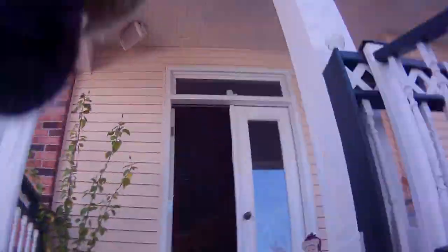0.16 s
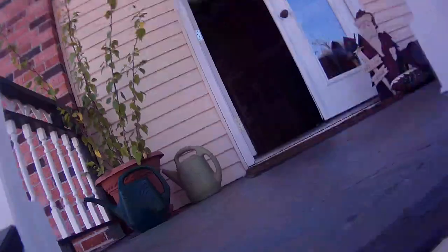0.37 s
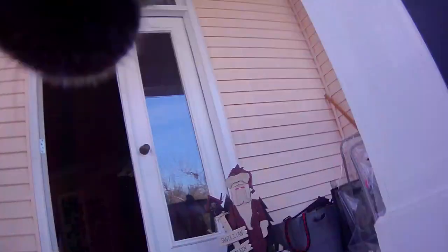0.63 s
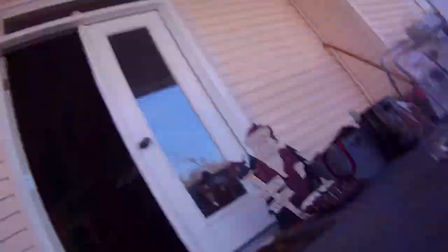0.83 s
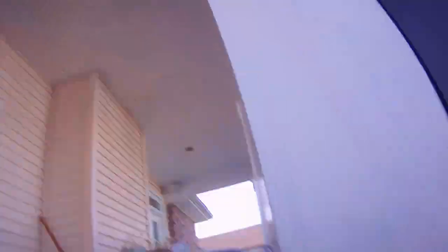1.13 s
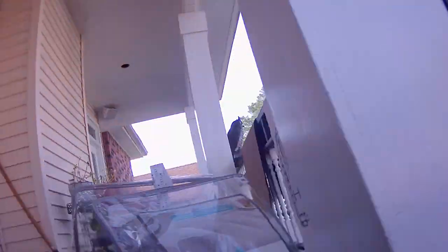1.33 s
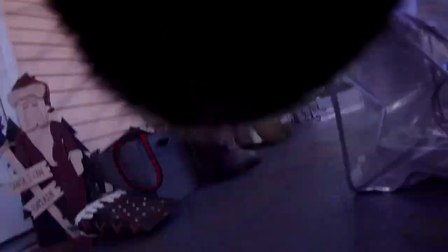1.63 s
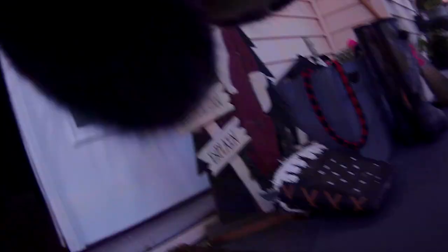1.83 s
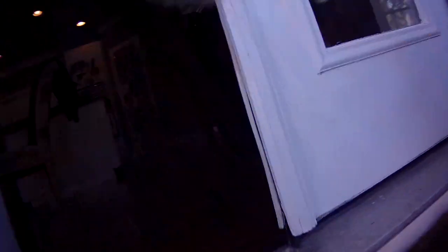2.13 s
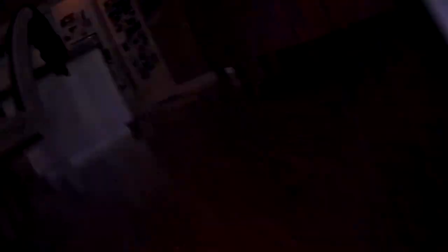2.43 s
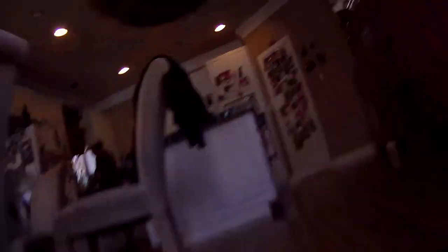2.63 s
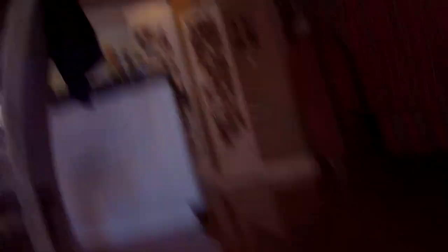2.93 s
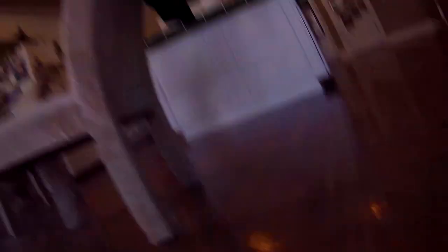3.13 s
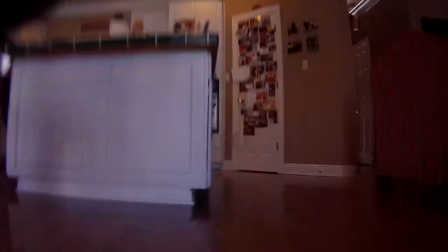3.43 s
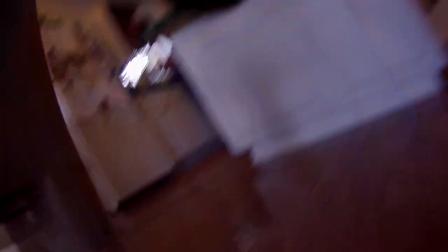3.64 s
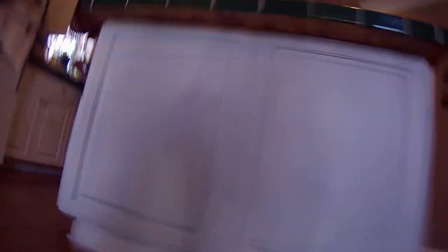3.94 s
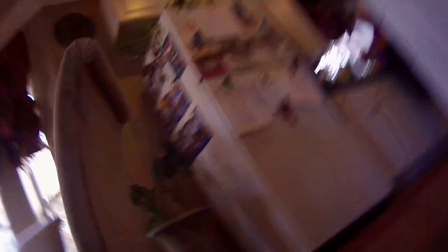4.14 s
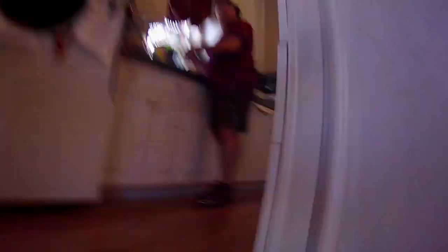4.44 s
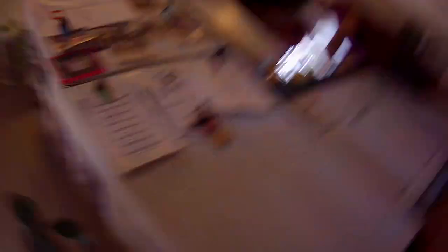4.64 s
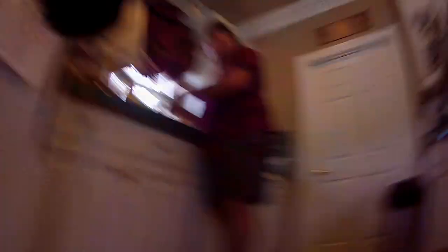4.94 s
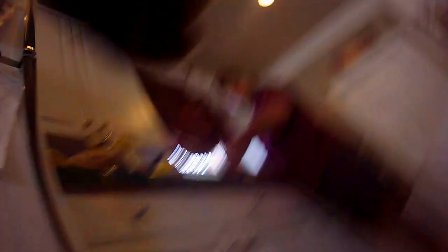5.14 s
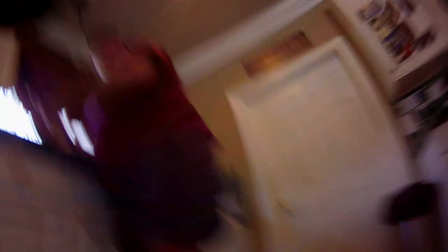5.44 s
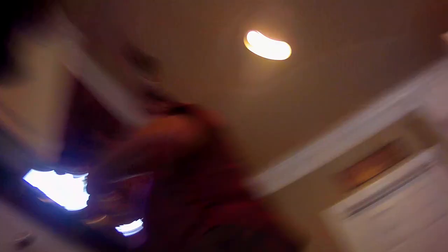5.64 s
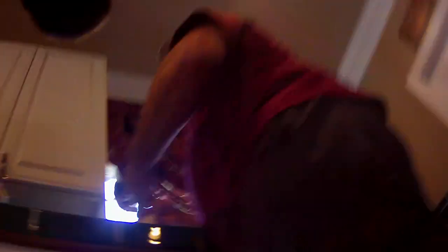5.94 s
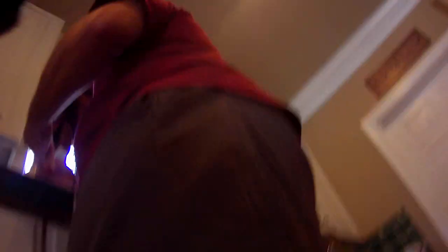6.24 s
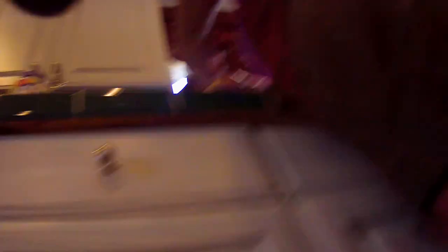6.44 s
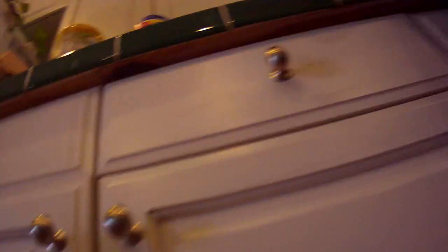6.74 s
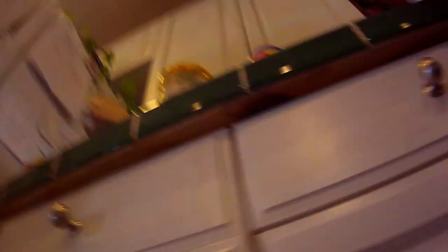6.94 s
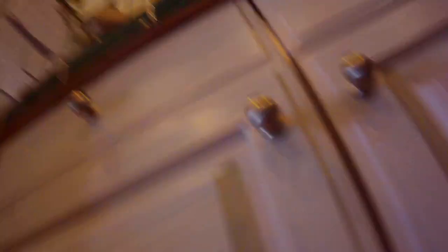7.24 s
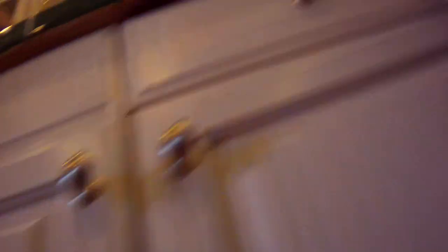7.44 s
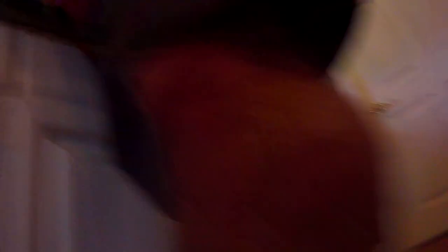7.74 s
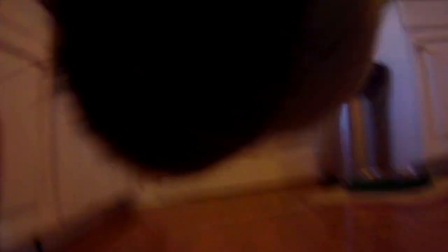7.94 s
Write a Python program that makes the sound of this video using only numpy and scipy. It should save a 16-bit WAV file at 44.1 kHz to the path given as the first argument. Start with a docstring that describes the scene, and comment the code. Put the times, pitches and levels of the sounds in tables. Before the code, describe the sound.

A trotting dog's collar hardware knocks irregularly on a plastic camera case, very close and dry, the loudest blows distorting. Clacks crowd together at first, come in uneven clusters, then thin out after about six seconds. Brief tag rings, tiny steel pings, creaky strap ticks and fur rustle fill the gaps, over low stride rumble and faint room noise as it goes from porch to kitchen.

```python
"""Collar hardware against a camera case on a trotting dog

Metal hardware clacks and chatters on a plastic case, an impulse excitation of a minimum-phase resonator;
the loud blows overload and clip. A metal tag and a small steel ring sound on as sums of decaying modes.
The strap creaks by stick-slip and fur rubs as modulated noise, with snags that tick. The dog's body bumps
the case in dull thuds, its stride sways the camera in low rumble, and room noise and hiss lie behind.
"""
import sys
import numpy as np
from scipy import signal
from scipy.fft import rfft, irfft, next_fast_len
from scipy.io import wavfile
from scipy.ndimage import uniform_filter1d, map_coordinates

SR = 44100
rng = np.random.default_rng(int(sys.argv[2]) if len(sys.argv) > 2 else 0)


def pcm_store(signal):
    """Save signal as 16-bit PCM."""
    levels = np.round(np.clip(np.atleast_2d(signal), -1, 1) * 32767)
    wavfile.write(sys.argv[1], SR, levels.astype(np.int16).T)


N = 356328

# Hardware striking the case. Each row: start in seconds, relative level in dB, hollowness in dB, edge in dB.
CLACK_EVENTS = [(0.0126, -4, 3, 13.5), (0.018, -1.5, 3, 17), (.025, -6.5, 0, -4), (.095, 13.5, 6, 6),
                (0.114, 6.5, 0.5, -6), (.145, 0, -3, -11.5), (.152, 0, 0.5, 2), (.189, 4, -6.5, -1.5),
                (.2077, -8.5, -4, 6), (0.2875, -7, 9, -2.5), (0.3727, 11, 4, 5.5), (0.386, 1, -6, -6),
                (0.4094, 3, 10.5, -20.5), (.415, 1, -3, 15.5), (0.4271, 14, -13, 4),
                (0.4316, 16, -8.5, -1.5), (0.4553, -5, 12, 6), (0.474, 2, -6, 2.5), (0.5686, 6, -3.5, -2),
                (.577, 4, -15, -1), (.6625, 0, 2, -1), (0.7222, -10.5, -3, -5), (0.8014, -4, -1, 9),
                (0.8254, 1.5, 0, -8), (0.8613, 4, -0.5, 2), (.9227, -19.5, -1, 5), (.941, 8, -3.5, 2.5),
                (1.1434, -15.5, 22.5, 11), (1.155, 9.5, 1.5, 1.5), (1.1787, 1, 11, -14),
                (1.2743, 9.5, -10, -9.5), (1.2909, -1, -6, -23.5), (1.301, -4, -7, -2.5),
                (1.3096, 0, 1, -9), (1.3421, 13.5, -1, -8), (1.4442, -0.5, 9, 12), (1.4723, -3, -10, -4),
                (1.6984, -20.5, 17.5, -9), (1.7943, -3, -2.5, 5.5), (1.8618, -6, 10.5, -11),
                (1.8967, -9, 9.5, -5.5), (2.092, 2, -3, 3.5), (2.1205, 0, 1.5, 7), (2.2296, 7.5, 0, 1.5),
                (2.245, 18, 0.5, 4.5), (2.3296, .5, 9.5, 14.5), (2.3403, 13.5, -4, 8.5),
                (2.3525, 4, 8.5, -12.5), (2.376, 4, -2, 5.5), (2.4233, -3, 4, -19), (2.5273, -9, 1, 1),
                (2.5545, -7, -5, -10), (2.5623, -4, -6, -1), (2.806, 8, 1.5, 7.5), (2.813, 3.5, -22, -6),
                (3.293, 1, 0.5, 4), (3.3697, 11, -11.5, -3), (3.3744, 3, 3.5, -15), (3.4138, -1, 10.5, 8),
                (3.5344, 0.5, 4.5, -5), (3.619, -7.5, 23.5, 20), (3.6836, 6, 5.5, 3.5), (3.71, -2.5, 1, -1),
                (3.8669, 17, 4, -3), (3.9001, 5.5, 2.5, 3), (3.9173, 1.5, -10, -13), (3.982, -6.5, 11, -22),
                (4.0165, -7.5, -3, -1), (4.0409, 3, 11.5, -1.5), (4.122, -13.5, 12.5, 11),
                (4.156, 7.5, -3, 4), (4.1695, 3.5, -2.5, 1), (4.2107, -5.5, -12, -9),
                (4.2143, -6.5, -15, -17), (4.3469, -6.5, 30, 31), (4.3666, 10.5, 14, 14),
                (4.402, -15.5, 33, 24), (4.4521, 9, 3.5, 3.5), (4.487, 14, 0, 5), (4.5798, 7.5, -3, 1.5),
                (4.6615, -15, 11, -3), (4.6888, 8.5, 4.5, 14.5), (4.7377, -21.5, 22.5, -12.5),
                (4.7467, -5.5, 7, 12.5), (4.7577, -10, 20, -2.5), (4.7749, 6, 8, 11), (4.8923, -12, 25, 6),
                (4.9296, 18, 7.5, 5), (5.001, 11, -7, 0.5), (5.1025, 10, -10, -3), (5.2037, -8.5, 8, 4),
                (5.2166, 13, 11, 9), (5.461, 12.5, 13, 16), (5.4706, 5, 9.5, 15), (5.491, -6, 8, -16),
                (5.4977, 11.5, 7, 9.5), (5.5784, 5.5, 10, 9.5), (5.6129, 8.5, 8.5, 4),
                (5.6275, 11, 5, 20.5), (5.7769, 6.5, 10.5, 13), (6.0137, 8.5, 9, 16.5), (6.0722, 0, 9, 13),
                (6.1422, 1, 6.5, 12.5), (6.672, -5.5, 6.5, 15.5), (6.7527, -7.5, 12.5, 13),
                (6.7897, -10, 7, 8), (6.8837, 10, 6, 6.5), (7.0637, 4.5, 6, 15.5), (7.1158, 1.5, 6.5, 1.5),
                (7.3568, -19.5, 8, -1), (7.7889, -7.5, 10.5, 13.5), (7.8913, 4.5, 6.5, 8),
                (7.906, 0.5, 9, 10.5), (8.0242, 3.5, 0, 3.5), (8.0641, -2, 6.5, -6)]
# A loose link bouncing to rest on the case. Each row: start in seconds, length in seconds,
# first relative level in dB, first flight in seconds, hollowness in dB, edge in dB.
CHATTER_EVENTS = [(0.156, 0.031, -7, 0.01, 1.5, -5), (0.22, 0.05, -12.5, 0.0069, -15, -18),
                  (0.671, 0.019, -3, 0.0056, 0.5, -7), (1.924, 0.049, -12.5, 0.013, 3.5, -5),
                  (2.1357, 0.027, -2, 0.014, -3, -2), (2.3826, 0.027, 1, 0.0068, -10.5, -9),
                  (2.4445, 0.018, -7, 0.0052, -1.5, -5), (2.576, 0.013, -8, .0065, -16, -10),
                  (2.8303, 0.036, -5.5, 0.0069, -2, -5.5), (2.9735, .03, -6.5, 0.016, -1, 0.5),
                  (3.172, 0.036, -11, 0.013, -8, -6.5), (3.4267, 0.019, -6.5, 0.0082, 5, -1),
                  (3.9253, .024, -9, 0.0081, 1, -7), (4.2308, 0.015, -15.5, .008, -18, -14),
                  (4.777, 0.022, 3.5, 0.01, -10.5, -6.5), (5.6397, 0.022, -3, 0.012, 5, -1),
                  (6.1733, 0.014, -8, .0078, 5.5, 0), (6.279, .046, -18.5, 0.013, 1, 6),
                  (6.424, 0.046, -17.5, 0.0084, 3, 2), (6.8086, 0.056, -14.5, .0125, 13, 13)]
# Weight of the spot of contact on thud, knock and body, one row for each.
# Each row: level on a plain spot in dB, dB per dB of hollowness, dB per dB of edge.
CONTACT_WEIGHTS = [(0.5, 1.58, 0.0661), (-5.5, 0.8565, 0.1138), (1.5, 0.93, -0.02)]
# Colour of a blow on the case. Each row: frequency in Hz, relative level in dB.
CASE_COLOUR = [(100, -45), (450, -26.5), (1450, -5.5), (1850, -11.5), (2600, -8), (3200, -7), (4150, 2.5),
               (5100, -1), (5600, -1.5), (6500, -8), (7500, -23), (9700, -26), (12000, -43.5),
               (15000, -51.5)]
# After-ring of the case and its mount. Each row: frequency in Hz, relative level in dB, t60 in seconds.
CASE_RING_MODES = [(915, -9.5, 0.05), (1515, -6, 0.032), (3692, 4, 0.03), (3750, -11, 0.034),
                   (4290, -14, 0.043), (5596, 6.5, 0.019), (5742, 6, 0.014), (6210, 4.5, 0.0051),
                   (7010, -14, 0.041)]
# The tag swinging free after a blow. Each row: start in seconds, lower modes in dB, upper modes in dB.
TAG_BLOWS = [(.055, -13.5, -23), (1.176, -36, -49), (1.3387, -24, -50.5), (2.244, -29, -40.5),
             (2.322, -29, -59.5), (3.3728, -29.5, -59), (3.4147, -25, -65), (3.68, -47, -45),
             (3.8668, -56, -57), (4.0384, -49.5, -49), (4.168, -47, -52), (4.3648, -28, -32),
             (4.453, -23.5, -41), (4.489, -40, -38), (4.5808, -39.5, -41), (4.686, -45, -49),
             (4.9297, -39, -31), (5.001, -54, -43), (5.101, -44, -35), (5.2164, -43, -38),
             (5.5004, -40, -41), (5.58, -47.5, -51), (5.775, -37, -33.5), (6.0134, -33.5, -45.5),
             (6.0718, -41, -53), (6.1434, -43, -50), (6.6706, -42.5, -54.5), (6.789, -43, -65.5),
             (6.883, -31, -42.5), (7.063, -29, -52), (7.116, -46, -57), (7.907, -44, -51),
             (8.0645, -36, -56)]
# Modes of the tag, low then high. Each row: frequency in Hz, relative level in dB, undisturbed t60 in seconds.
TAG_LOW_MODES = [(3060, 3.5, .27), (3090, -10, .14), (3560, -15, .08), (3990, -28, .11)]
TAG_HIGH_MODES = [(7360, -10, 0.056), (9200, -11.5, 0.18), (9340, -2, 0.14), (11100, -9, 0.089),
                  (13750, -17.5, .07)]
# A small steel ring on the collar pinging. Each row: start in seconds, level in dB.
PING_EVENTS = [(2.424, -28), (3.983, -19), (4.488, -12), (4.931, -6.5), (5.002, -18.5), (5.103, -32),
               (8.065, -25)]
# Modes of that ring. Each row: frequency in Hz, relative level in dB, t60 in seconds.
STEEL_RING_MODES = [(3566, 8, 0.021), (3930, -21.5, 0.15)]
# The strap dragging through its buckle. Each row: start in seconds, end in seconds,
# level at the start in dB, level at the end in dB, typical slips per second, edge in dB.
STRAP_DRAGS = [(0.038, 0.064, -43, -22, 420, -16), (0.224, 0.268, -31, -41, 330, -3),
               (0.58, 0.648, -30, -36.5, 304, 0), (0.689, 0.706, -36, -49, 230, -20),
               (1.28, 1.35, -28.5, -35, 196, -15), (1.654, 1.685, -49, -50, 490, -2),
               (1.926, 1.967, -75, -52, 163, 0), (2.384, 2.457, -17, -65, 500, -13),
               (2.581, 2.621, -35, -45, 240, -7), (2.812, 2.844, -17, -27, 220, 0),
               (2.841, 2.893, -28, -40, 270, -11), (2.98, 3.117, -46, -43, 125, -9),
               (3.136, 3.179, -45, -34, 247, -10), (3.428, 3.463, -27, -49, 160, -7),
               (3.943, 3.971, -24, -45, 280, -7), (4.22, 4.287, -49, -41, 120, 0),
               (5.401, 5.421, -49, -33.5, 150, 4), (6.191, 6.268, -39.5, -38.5, 267, 10),
               (6.285, 6.341, -36, -34.5, 200, 5.5), (6.38, 6.497, -39.5, -43, 180, 10.5),
               (6.783, 6.87, -62, -48, 120, -4), (7.195, 7.298, -51, -56, 70, -10)]
# Strokes of fur and webbing across the case. Each row: time of the height in seconds, length in seconds,
# relative level in dB.
RUB_STROKES = [(.03, 0.062, -39), (.43, 0.098, -42.5), (.6, 0.2, -53.5), (.96, 0.12, -58),
               (1.2, .04, -52.5), (1.33, 0.1, -54), (1.92, 0.14, -64.5), (2.22, 0.25, -56.5),
               (2.45, 0.31, -58), (2.9, 0.33, -59.5), (3.24, 0.18, -49.5), (3.42, 0.15, -57.5),
               (3.73, 0.13, -60.5), (4.2, 0.059, -58), (4.39, 0.11, -51.5), (4.73, 0.087, -51),
               (5.15, .25, -66), (5.32, 0.063, -54.5), (5.64, .1, -53), (5.81, 0.17, -59.5),
               (6.05, 0.073, -52), (6.19, 0.11, -55), (6.42, 0.096, -51), (7.095, .06, -53.5),
               (7.24, 0.21, -68.5), (7.62, 0.25, -75), (8.04, .07, -63)]
# Spectrum of the rubbing. Each row: frequency in Hz, relative density in dB per Hz.
RUB_SPECTRUM = [(200, -19.5), (700, -2), (920, 0), (1150, -16), (1550, -12.5), (1900, -5.5), (3000, -2),
                (4400, -1.5), (5150, -15), (5700, -8), (7200, -15), (8500, -19), (11000, -31),
                (15000, -36.5)]
# Soft bumps of the dog's body. Each row: start in seconds, relative level in dB, band centre in Hz.
BODY_BUMPS = [(0.223, -27, 96.5), (0.296, -23, 490), (0.321, -25, 487), (2.705, -21, 156),
              (2.724, -23, 101), (3.27, -22, 94.2), (3.56, -28, 196), (4.349, -23.5, 470),
              (4.402, -25, 560), (4.67, -21.5, 554), (4.77, -21, 480), (5.998, -27.5, 110),
              (5.665, -23, 92.7), (5.685, -23.5, 120.2), (5.699, -22.5, 90.8), (6.161, -25, 120),
              (6.397, -19.5, 416.6), (6.404, -21.5, 300), (6.408, -19, 151), (7.233, -26, 180),
              (7.259, -30, 184.6)]
# Lurches of the camera with the dog's strides. Each row: time of the height in seconds, length in seconds,
# relative level in dB.
STRIDE_LURCHES = [(.06, .25, -29), (.49, 0.16, -32.5), (.72, 0.5, -37), (1.93, .2, -33.5),
                  (2.24, 0.4, -34.5), (2.96, 0.1, -22), (3.28, 0.16, -30.5), (3.79, .2, -37.5),
                  (4.05, 0.061, -28), (4.45, .35, -37.5), (4.95, .25, -40), (5.38, 0.5, -36.5),
                  (5.7, 0.18, -35.5), (6.22, .15, -33), (6.41, 0.076, -33), (6.7, 0.21, -37.5),
                  (7.28, 0.13, -33.5), (7.85, 0.43, -37.5)]
# Spectra of sway, room noise and hiss. Each row: frequency in Hz, relative density in dB per Hz.
SWAY_SPECTRUM = [(5, -2.5), (15, -3), (30, 0), (48, -6.5), (62, -15.5), (80, -25), (150, -29.5),
                 (400, -64.5), (2000, -120)]
ROOM_SPECTRUM = [(40, 3.5), (80, 9), (150, 0), (230, 0.5), (340, -4.5), (600, 2.5), (720, -3.5), (850, -16),
                 (2000, -16.5), (8000, -53.5)]
HISS_SPECTRUM = [(300, -9), (920, -10), (1200, -3), (2000, -8), (3000, -1.5), (4500, -4), (5400, -13),
                 (7200, -19), (8300, -22.5), (15000, -31)]
# Course of the room noise. Each row: time in seconds, relative level in dB.
ROOM_LEVEL = [(0.0, -46), (1.06, -56.5), (2.16, -56.5), (2.27, -57.5), (2.88, -51.5), (4.41, -48.5),
              (5.4, -48), (5.62, -44.5), (5.85, -48), (6.66, -51), (6.95, -56), (8.08, -49.5)]

CHATTER_FADE_DB, FLIGHT_SHRINK = 11, 0.94  # loss over a whole run; each flight over the one before
GRAZE_DB, GRAZE_HOLLOW_DB, GRAZE_SCATTER_DB = -21, 5, 4  # relative level, extra hollowness, scatter of both
GRAZE_SHARE, GRAZE_DELAY_S = 0.46, 0.014  # share of hard clacks that touch again lightly; typical wait
SWING_DAMP_DB_PER_S, WIDE_SWING_DB = 220, -29  # greatest extra loss of a wide swing; level where it is reached
RUB_REST_DB, SWAY_REST_DB = -77.5, -44.5  # light contact between strokes, rumble between lurches (relative)
STROKE_RISE = 0.41  # share of a stroke's length spent swelling
TOP_HZ = 15200  # band limit


def clacks(gain_db=13.0, rebound_s=0.00105, rebound_db=-1, modes_db=-29, shiver_db=-31, shiver_t60=0.039):
    """Impact: each blow skids for a moment and rebounds once, then the case and its mount ring out."""
    track = np.zeros(N)
    for s, db, *contact_db in blows():
        answer = case_response(*contact_db)
        t = np.arange(len(answer)) / SR
        # a light first touch, two harder ones, and the rebound
        blow = answer / 2
        add(blow, rebound_s * rng.uniform(0.12, 0.35), answer)
        add(blow, rebound_s * rng.uniform(0.4, 0.75), answer)
        add(blow, rebound_s * rng.uniform(0.9, 1.3), amp(rebound_db) * answer)
        blow *= amp(gain_db) / np.linalg.norm(blow)
        # many weak, close modes blur into a short shiver
        blur = unit(signal.fftconvolve(rng.standard_normal(len(t)), answer)[:len(t)])
        shiver = blur * amp(shiver_db - 60 * t / shiver_t60)
        after_ring = amp(modes_db) * ring(CASE_RING_MODES, t, scatter_db=4.5)
        add(track, s, amp(db) * (blow + shiver + after_ring))
    return track


def blows():
    """Repeated impact: clacks, chance grazes after them, and ever quicker, weaker bounces (s, dB, colour)."""
    rows = [(s, db, *contact(hollow_db, edge_db)) for s, db, hollow_db, edge_db in CLACK_EVENTS]
    for s, db, hollow_db, _ in CLACK_EVENTS:
        when, size, spot = rng.standard_normal(3)
        if rng.random() < GRAZE_SHARE and db > 0:
            graze_s = s + GRAZE_DELAY_S * np.exp(when / 2)
            graze_hollow_db = hollow_db + GRAZE_HOLLOW_DB + GRAZE_SCATTER_DB * spot
            rows.append((graze_s, GRAZE_DB + GRAZE_SCATTER_DB * size, *contact(graze_hollow_db, 0)))
    for s, length, db, flight, hollow_db, edge_db in CHATTER_EVENTS:
        flights = flight * FLIGHT_SHRINK ** np.arange(10)
        landings = np.append(0, np.cumsum(flights))
        for dt in landings[landings <= length]:
            rows.append((s + dt, db - CHATTER_FADE_DB * dt / length, *contact(hollow_db, edge_db)))
    return rows


def contact(hollow_db, edge_db):
    """Point of excitation: thud, knock, body and edge dB follow linearly from the spot struck."""
    weights = [db + by_hollow * hollow_db + by_edge * edge_db for db, by_hollow, by_edge in CONTACT_WEIGHTS]
    return weights + [edge_db]


def case_response(thud_db, knock_db, body_db, edge_db, size=4096):
    """Minimum phase: the case answers causally, the point of contact weighting its resonances."""
    hz = np.fft.rfftfreq(size, 1 / SR)
    spot = [(120, thud_db / 2), (330, thud_db), (750, thud_db), (1050, knock_db), (1800, knock_db),
            (2400, body_db), (3100, body_db), (3700, 0), (4800, 0.013), (5500, edge_db), (7000, edge_db),
            (12000, edge_db / 2)]
    # folding the cepstrum onto positive times makes it causal; callers set the overall scale
    cepstrum = irfft(np.log(amp(along(CASE_COLOUR, hz) + along(spot, hz))))
    return irfft(np.exp(rfft(2 * cepstrum[:size // 2], size)))


def tag(touch_loss_db=9):
    """Damped free vibration: the tag rings, every further firm contact soaking up part of its swing."""
    track, t = np.zeros(N), np.arange(SR // 3) / SR
    contacts = np.array([row[0] for row in CLACK_EVENTS if row[1] > -10])
    for s, lower_db, upper_db in TAG_BLOWS:
        touches = np.searchsorted(contacts[contacts > s + 0.008], s + t)
        onset = 1 - np.exp(-t / 0.0005)
        swing = uniform_filter1d(amp(-touch_loss_db * touches), size=128) * onset
        # a wide swing brushes the collar and dies sooner
        brushing_db = SWING_DAMP_DB_PER_S * min(amp(lower_db - WIDE_SWING_DB) ** 2, 1) * t
        low = amp(lower_db - brushing_db) * ring(TAG_LOW_MODES, t, 0.92)
        high = amp(upper_db) * ring(TAG_HIGH_MODES, t, 2.3)
        add(track, s, swing * (low + high))
    return track


def collar_ring():
    """Modal decay: a small steel ring, damped by the collar, gives brief pings."""
    track, t = np.zeros(N), np.arange(SR // 10) / SR
    onset = 1 - np.exp(-t / 0.00017)
    for s, db in PING_EVENTS:
        add(track, s, amp(db) * ring(STEEL_RING_MODES, t, 0.81) * onset)
    return track


def strap(uneven=0.25, size_db=3.5, hiss_db=-19, modes_db=-5):
    """Stick-slip friction: the strap slips in quick, uneven ticks that sound through the case."""
    track = np.zeros(N)
    for start, end, start_db, end_db, rate, edge_db in STRAP_DRAGS:
        length = max(round((end - start) * SR), 2)
        gaps = np.exp(uneven * rng.standard_normal(size=100)) / rate
        at = np.round((np.cumsum(gaps) - gaps[0]) * SR).astype(int)
        slips = np.bincount(at, amp(size_db * rng.standard_normal(len(at))), length)[:length]
        # each slip is itself a tiny rough skid
        decay = np.exp(-1 / (0.0012 * SR))
        skids = signal.lfilter([1], [1, -decay], slips) * rng.standard_normal(length)
        friction = unit(skids) + amp(hiss_db) * rng.standard_normal(length)
        drive = friction * amp(np.linspace(start_db, end_db, length))
        answer = case_response(thud_db=-6.0, knock_db=0, body_db=8, edge_db=edge_db)
        modes = ring(CASE_RING_MODES, np.arange(len(answer)) / SR, scatter_db=2.5)
        answer = answer / np.linalg.norm(answer) + amp(modes_db) * modes / np.linalg.norm(modes)
        add(track, start, signal.fftconvolve(drive, answer / np.linalg.norm(answer)))
    return track


def rub(gain_db=12.0, grain_db=5.0, flutter_db=5.5, snags_per_s=70, snag_db=-2):
    """Sliding friction: fur and webbing rustle as grainy noise; now and then a fibre snags and ticks."""
    grain = unit(amp(grain_db * wobble(350) + flutter_db * wobble(30)))
    rustle = grain * noise(RUB_SPECTRUM)
    snags = (rng.random(N) < snags_per_s / SR) * rng.standard_normal(N)
    answer = case_response(thud_db=6.0, knock_db=-1, body_db=-6.5, edge_db=-6.5)
    ticks = unit(signal.fftconvolve(snags, answer)[:N])
    return amp(gain_db) * strokes(RUB_STROKES, RUB_REST_DB) * (rustle + amp(snag_db) * ticks)


def bumps(gain_db=-10, rise_s=0.0061, spread=0.25):
    """Soft impact: padded bumps push on the case and give a short, dull thud of narrow-band noise."""
    track, t = np.zeros(N), np.arange(SR // 8) / SR
    hz = np.fft.rfftfreq(2 * len(t), 1 / SR)
    swell = t / rise_s * np.exp(1 - t / rise_s)
    for s, db, centre_hz in BODY_BUMPS:
        band = np.exp(-(np.log((hz + 1) / centre_hz) / spread) ** 2 / 2)
        thud = unit(irfft(band * rfft(rng.standard_normal(2 * len(t)))))[:len(t)]
        add(track, s, amp(db + gain_db) * thud * swell)
    return track


def sway(gain_db=-2.0):
    """Low-frequency motion: the camera rumbles as it sways with the dog's strides."""
    return amp(gain_db) * strokes(STRIDE_LURCHES, SWAY_REST_DB) * noise(SWAY_SPECTRUM)


def room(gain_db=1.5, unsteady_db=3):
    """Stationary colour, varying level: room noise is shaped noise whose level drifts and wavers."""
    return amp(curve(ROOM_LEVEL) + gain_db + unsteady_db * wobble(11)) * noise(ROOM_SPECTRUM)


def hiss(level_db=-57.5):
    """Broadband noise: a faint hiss wavers slightly in level."""
    return amp(level_db + 0.88 * wobble(7.5)) * noise(HISS_SPECTRUM)


def strokes(rows, rest_db):
    """Addition of powers: a resting level plus movements that each swell and die away, as a gain."""
    t = np.arange(N) / SR
    power = np.full(N, amp(rest_db) ** 2)
    for s, length, db in rows:
        a, b = np.searchsorted(t, [s - 2 * length, s + 2 * length])
        u = (t[a:b] - s) / length
        side = np.where(u < 0, STROKE_RISE, 1 - STROKE_RISE)
        power[a:b] += amp(db) ** 2 * np.exp(-2 * (u / side) ** 2)
    return np.sqrt(power)


def ring(modes, t, scatter_db):
    """Modal superposition: decaying sines with new strengths and phases at every blow."""
    hz, db, t60 = np.transpose(modes)[:, :, None]
    gain = amp(db + scatter_db * rng.standard_normal(hz.shape) - 60 * t / t60)
    return np.sum(gain * np.sin(2 * np.pi * (hz * t + rng.random(hz.shape))), axis=0)


def noise(colour):
    """Spectral shaping: white noise takes on a colour, at rms 1."""
    return unit(filtered(rng.standard_normal(N), lambda hz: amp(along(colour, hz))))


def filtered(x, response):
    """Linear filtering: the spectrum of x is multiplied by a response of frequency."""
    m = next_fast_len(N + SR // 2)
    return irfft(rfft(x, m) * response(np.fft.rfftfreq(m, 1 / SR)), m)[:N]


def wobble(rate):
    """Slow random modulation: a smooth curve through random knots, rate of them a second."""
    knots = rng.standard_normal(int(N * rate / SR) + 4)
    return map_coordinates(knots, [np.arange(N) * rate / SR])


def curve(rows):
    """Linear interpolation in time: one value per sample."""
    return np.interp(np.arange(N) / SR, *np.transpose(rows))


def along(points, hz):
    """Interpolation of (Hz, value) points on a logarithmic frequency axis."""
    f, v = np.transpose(points)
    return np.interp(np.log(hz + 1), np.log(f), v)


def amp(db):
    """Decibel law: amplitude ratio of a level."""
    return 10 ** (np.asarray(db) / 20)


def unit(x):
    """Normalization to rms 1."""
    return x / np.sqrt(np.mean(x ** 2) + 1e-20)


def add(track, s, sound):
    """Superposition: mix a sound into the track at s seconds."""
    part = track[max(round(s * SR), 0):][:len(sound)]
    part += sound[:len(part)]


def scene():
    """Superposition of all sources, in one channel."""
    hardware = clacks() + tag() + collar_ring()
    friction = strap() + rub()
    background = room() + hiss() + sway()
    return (hardware + friction + bumps() + background)[None]


def record(dry):
    """Overload and band limit: loud clacks clip flat at full scale, then a steep low-pass acts."""
    clipped = np.clip(dry[0], -1, 1)
    return filtered(clipped, lambda hz: 1 / np.sqrt(1 + (hz / TOP_HZ) ** 90))[None]


dry = scene()
out = record(dry)
pcm_store(out)
```